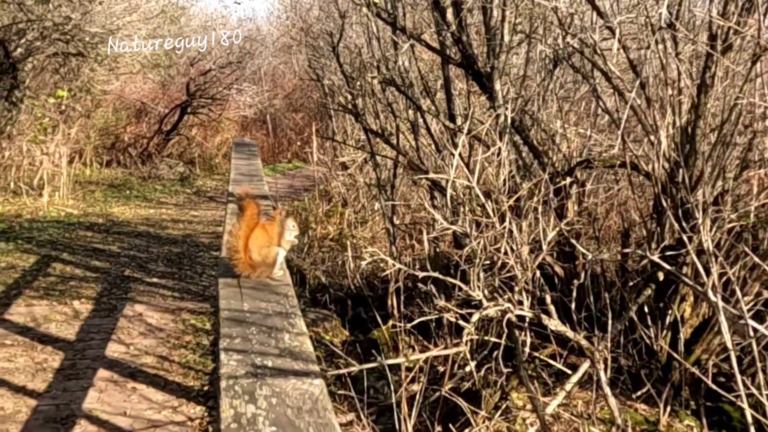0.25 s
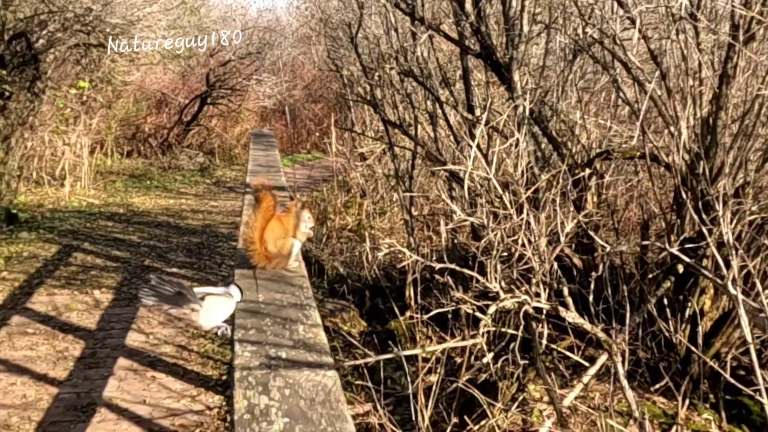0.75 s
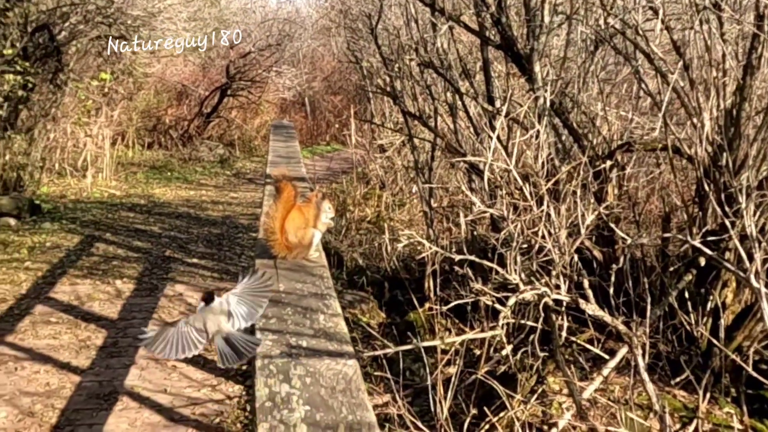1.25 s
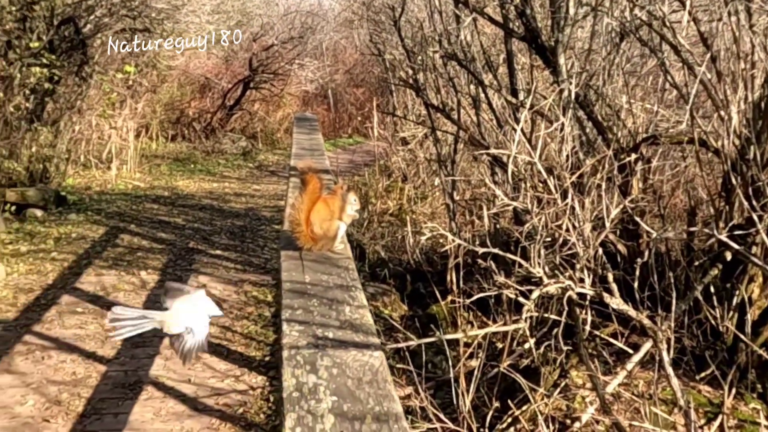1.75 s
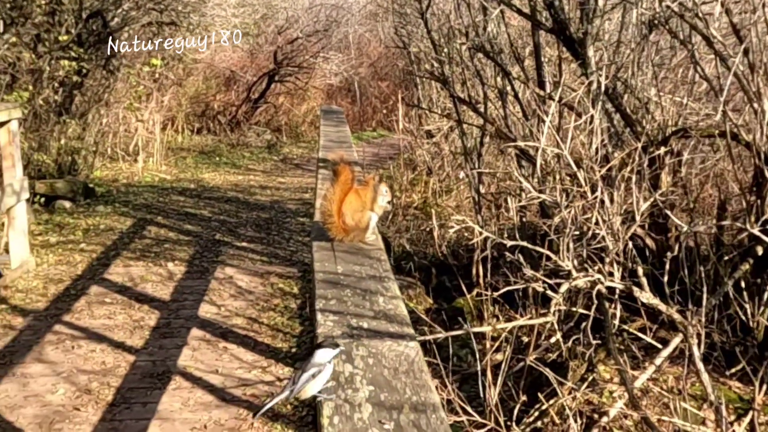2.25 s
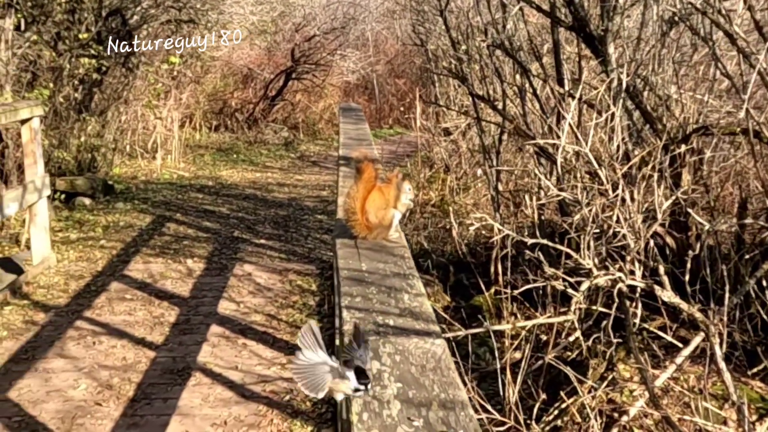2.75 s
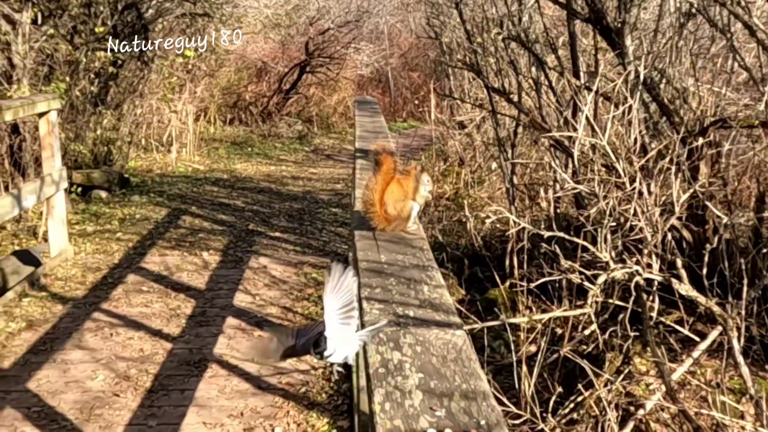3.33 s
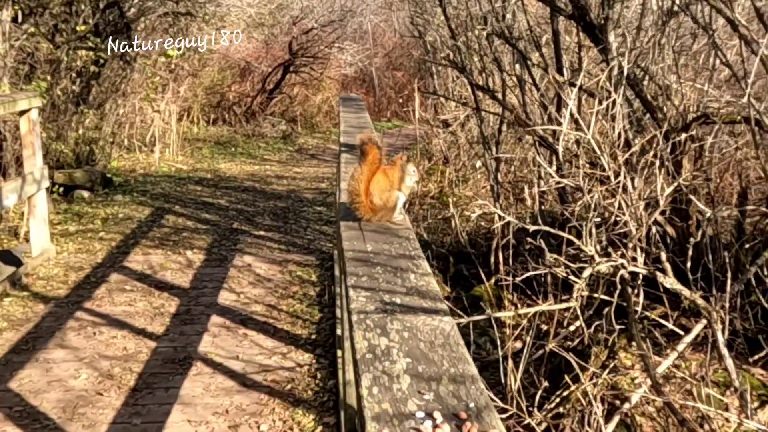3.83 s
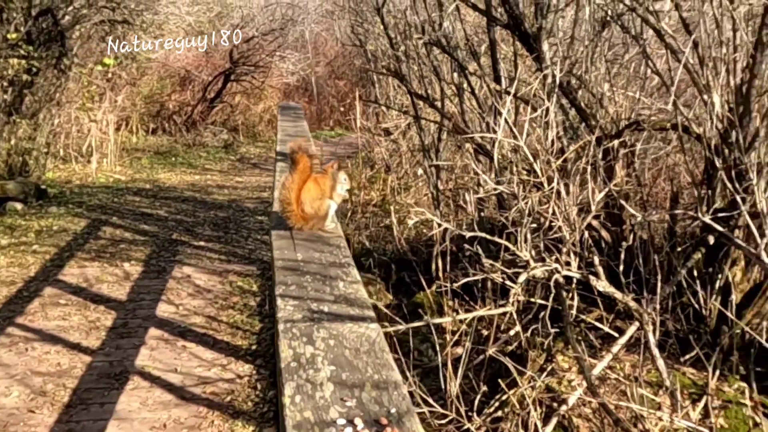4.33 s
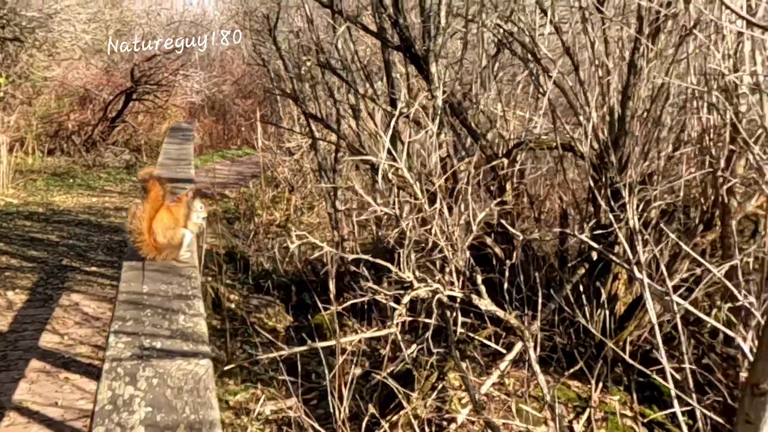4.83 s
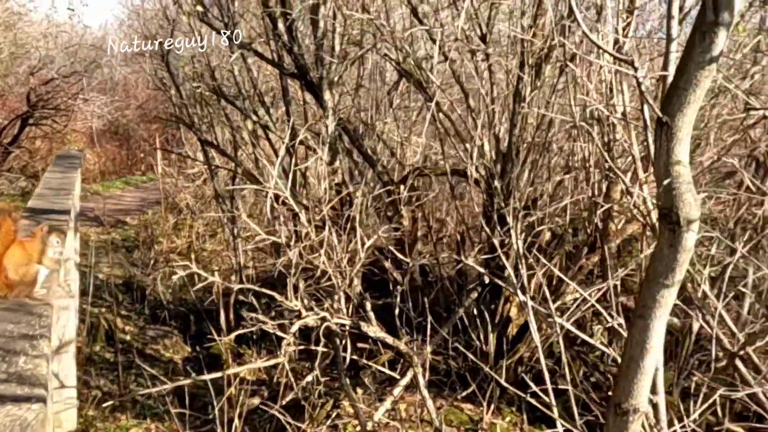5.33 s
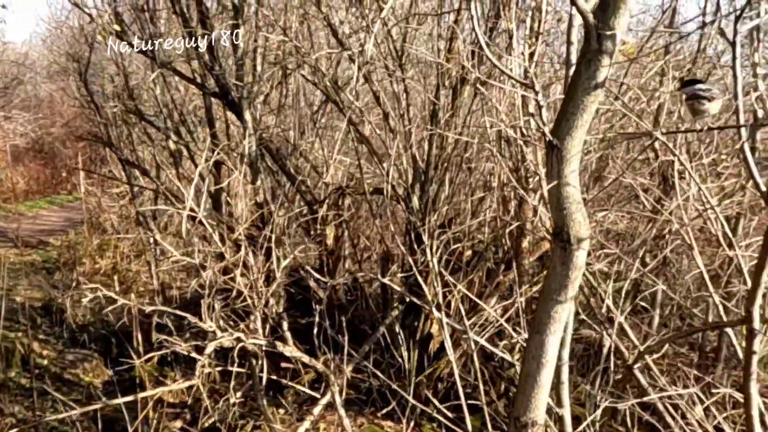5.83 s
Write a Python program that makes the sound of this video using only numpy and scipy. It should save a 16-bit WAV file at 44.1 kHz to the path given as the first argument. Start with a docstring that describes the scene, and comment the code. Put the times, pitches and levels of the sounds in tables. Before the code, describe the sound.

Outdoors in bare shrubland, low distant traffic rumbles under a soft airy wash. A few faint high peeps and claw ticks come first, then papery wing whirrs and scuffles build on a wooden rail, with sharp wing slaps near the middle. Close chickadees give thin piercing whistles, then two buzzy notes, then spaced lower chirps, with others answering faintly. The stereo microphone is close, catching short scatter from twigs.

```python
"""Bare shrubland with a wooden rail, far traffic rumbling low beneath a soft wash.
Close to the microphone, chickadees whistle thin arched notes, most ending in a quick downward flick: near sines
with a moving pitch. One adds two buzzy 'dee' notes, stacks of harmonics under two resonances.
Others answer from the thicket, heard only as scatter. Wings whirr in shaped noise; claws tick on the rail
and a few wings slap sharply, as short cracks with a knock. The twigs scatter birds, wings and ticks."""
import sys
import numpy as np
from scipy import signal
from scipy.fft import rfft, irfft, next_fast_len
from scipy.io import wavfile
from scipy.ndimage import uniform_filter1d

SR = 44100
rng = np.random.default_rng(int(sys.argv[2]) if len(sys.argv) > 2 else 0)


def dump(signal):
    """Clip the signal to [-1, 1] and save it as 16-bit WAV at the path in sys.argv[1]."""
    limited = np.clip(np.atleast_2d(signal).T, -1, 1)
    pcm = np.round(limited * 32767).astype(np.int16)
    wavfile.write(sys.argv[1], SR, pcm)


N = 268877
TIME = np.arange(N) / SR

# spectrum of the distant rumble: hz [Hz], relative_db [dB per Hz]
RUMBLE_SPECTRUM = [(8.8, -50.5), (15, 2.5), (60, 0.5), (126, -8.5), (173, -18), (260, -26), (340, -33),
                   (570, -120)]
# course of the rumble below and above the split: at_s [s], depths_db [dB], upper_db [dB]
RUMBLE_COURSE = [(0, -30.5, -34.5), (.8, -31, -32), (1.3, -31.5, -32.5), (3.2, -32.5, -31.5),
                 (4.2, -33.5, -31), (4.8, -32.5, -34.5), (6.1, -32, -34.5)]
RUMBLE_SPLIT_HZ = 85
# a faint wavering hum within the rumble
HUM_HZ, HUM_DB = 200, -61
# spectrum of the wash of air: hz [Hz], relative_db [dB per Hz]
WASH_SPECTRUM = [(120, -24.5), (165, -6), (200, -7.5), (260, -5), (350, -4), (500, -8), (780, -13),
                 (980, -11.5), (1400, -16.5), (2080, -24), (4200, -41), (8000, -45), (9500, -63),
                 (13000, -60.5)]
# course of the wash: at_s [s], body_db [dB], treble_db [dB, used only as change about its median]
WASH_COURSE = [(0.0, -44, -50.5), (0.25, -45.5, -51.5), (2.45, -45, -51), (2.75, -43.5, -51.5),
               (3.05, -44.5, -50), (3.99, -43.5, -50.5), (4.43, -45, -51.5), (4.67, -42.5, -50),
               (5.3, -44.5, -49.5), (5.86, -45.5, -49)]
WASH_SPLIT_HZ = 650
# stereo width of the background: hz [Hz], left_right_likeness [0-1]
LIKENESS_BY_HZ = [(60, .99), (130, .98), (300, .95), (650, .6), (1400, .5), (3000, .5), (8000, .3)]
# stereo balance of the background: hz [Hz], left_over_right_db [dB]
LEAN_BY_HZ = [(100, 0), (180, 0), (300, 2.5), (520, 4.5), (900, 4.5), (1550, 3.5), (2660, 2.5), (4570, 1),
              (7850, 2.5)]

# scatter of the nearest twigs, stronger on the lower notes: hz [Hz], gain_db [dB]
TWIG_SCATTER_GAIN = [(1500, -10), (4000, -7), (5500, -6.5), (7000, -9.5), (8000, -11), (14000, -11)]
# birds deep in the thicket: start_s [s], length_s [s], pitch_hz [Hz], level_db [dB],
# huskiness [relative pitch scatter]
FAR_NOTE_ROWS = [(1.276, 0.053, 7770, -62, 0.025), (1.395, 0.037, 7410, -54.5, 0.025),
                 (1.52, 0.044, 7170, -60.5, 0.0091), (4.789, 0.034, 7120, -46.5, 0.089),
                 (4.893, 0.023, 6700, -53.5, .13), (4.968, 0.042, 7140, -47.5, 0.1),
                 (5.065, 0.031, 5320, -51.5, 0.19), (5.165, 0.043, 7030, -48, 0.074),
                 (5.356, 0.04, 7070, -50, 0.088)]

# flurries of wings and scuffling feet: start_s [s], length_s [s], level_db [dB]
FLURRIES = [(0.53, 0.17, -65.5), (.75, 0.89, -75.5), (1.368, 0.069, -62.5), (1.642, 0.021, -62),
            (1.86, 0.091, -63.5), (2.403, 0.15, -68.5), (2.854, 0.16, -67.5), (3.044, 0.01, -57),
            (3.13, 0.76, -60.5), (3.8, 0.029, -51), (3.863, 0.043, -50.5), (4.038, 0.013, -57.5),
            (5, 0.62, -75), (5.45, 0.77, -69.5)]
# their spectrum: hz [Hz], gain_db [dB]
FLURRY_COLOUR = [(200, -1), (500, 19.5), (1500, 7), (3000, -3.5), (6000, -5), (8500, -10.5), (11000, -8.5),
                 (12500, -19), (13800, -47.5)]
FLURRY_RISE_DB_PER_S, FLURRY_FALL_DB_PER_S = 251, 119
# tiny scratches of feet and feathers: average rate, scale of sizes, level relative to the wings
GRIT_PER_S, GRIT_SPREAD_DB, GRIT_DB = 1600, 4, -2
# sharpness and range of their pitches
GRIT_Q, GRIT_LOW_HZ, GRIT_HIGH_HZ = 10, 2200, 11000

# ticks of claws on the rail, and a few sharp wing slaps near 3.8-3.9 s: start_s [s], level_db [dB],
# crack_hz [Hz], knock_db [dB, knock relative to the crack]
TICK_AND_SLAP_ROWS = [(.630, -48, 9000, -17), (1.058, -39.5, 2900, -13), (1.378, -48, 3200, -16),
                      (2.053, -39.5, 3320, -2), (2.557, -45.5, 2400, -16), (3.005, -42.5, 2600, -5),
                      (3.015, -48, 3200, -12), (3.041, -42, 5200, -20), (3.047, -38.5, 4900, -13),
                      (3.048, -40, 10500, -27), (3.071, -42, 3300, -22), (3.178, -45, 3100, -13),
                      (3.207, -47, 9500, -18), (3.270, -45, 5700, -22), (3.372, -38.5, 2600, -16),
                      (3.397, -43, 2400, -7), (3.415, -43, 6100, -24), (3.573, -43, 2400, -18),
                      (3.612, -39.5, 2500, -22), (3.655, -44, 5200, -20), (3.788, -35, 4000, -22),
                      (3.796, -32, 5700, -36), (3.809, -37, 5100, -25), (3.840, -27, 5170, -38),
                      (3.873, -42, 2800, -20), (3.887, -27, 3370, -23), (3.888, -31, 9800, -34),
                      (3.914, -40, 3500, -18), (3.930, -41, 2700, -16), (4.007, -47, 2400, -3.5),
                      (4.050, -45, 4900, -20), (4.262, -45.5, 5300, -16)]
# spectrum of the noise in the cracks: hz [Hz], gain_db [dB]
CRACK_COLOUR = [(600, -34), (2200, 0.5), (3300, -1.5), (5500, -3.5), (8000, -7.5), (11500, -14.5),
                (14000, -42.5)]
# modes of the rail's short knock: hz [Hz], relative_db [dB], t60_s [s]
RAIL_KNOCK_MODES = [(460, 1, 0.11), (790, -4, 0.038), (1150, 12.5, 0.025), (1216, 1, 0.037),
                    (1630, -3, 0.024), (2500, -16, 0.0092), (3250, 7.5, 0.012)]
# how narrowly a crack rings, and the broad burst of noise around it
CRACK_Q, BURST_DB = 2, 0

# two buzzy notes, each a contour: at_s [s], pulse_rate_hz [Hz], level_db [dB],
# lower_resonance_hz [Hz], upper_resonance_hz [Hz], rasp_db [dB relative to the harmonics]
DEE_CONTOURS = [
    [(4.629, 380, -42, 4800, 5600, 5), (4.646, 388, -45, 3950, 4700, -1),
     (4.660, 396, -44, 3960, 4360, -14), (4.680, 396, -42.5, 3960, 4350, -19),
     (4.703, 390, -48.5, 3500, 3900, -7), (4.733, 384, -53, 3400, 3800, -3),
     (4.752, 370, -56, 3100, 3500, 0)],
    [(4.818, 378, -59, 3500, 3900, -2), (4.838, 386, -51, 3250, 3860, -7),
     (4.868, 390, -49, 3400, 3560, -14), (4.897, 396, -49, 3170, 4020, -15),
     (4.928, 390, -46.5, 3370, 3920, -11), (4.944, 372, -56, 3100, 3500, -3)],
]
# overall colour of the buzz: hz [Hz], relative_db [dB]
BUZZ_COLOUR = [(1150, -20), (1570, -8), (1970, 9), (2350, 2), (2750, -2), (3150, -1.5), (3500, 1),
               (4300, -.5), (5100, 4), (6200, 0), (8500, -12)]

# near whistles, one row for each voice of the syrinx: start_s [s], length_s [s, before the flick],
# turn_hz [Hz, pitch at the turn], scoop [share by which it starts lower], turn [place of the turn, 0-1],
# level_db [dB], swell_db [dB, start to end], bulge_db [dB, middle over ends], flick_s [s],
# flick_step_db [dB, step into the flick], end_hz [Hz, pitch the flick falls towards],
# pan_db [dB, left over right], sent_db [dB, share sent into the shrubs]
WHISTLE_ROWS = [ (0.461, 0.049, 7360, 0.13, .58, -47, -6, -3, 0, 0, 7000, -1.5, -1),
                (1.23, 0.036, 7140, -0.036, 0.51, -38.5, -7, 2, 0.012, 4, 4560, 2, -3),
                (3.436, .017, 8200, .16, .8, -56, 2, 2, .022, 6, 4200, 8, 0),
                (3.633, 0.06, 8145, 0.11, .76, -34, 13, 5, 0.017, 2.5, 4400, -3, 2.5),
                (3.643, 0.06, 9600, 0.17, .7, -38, -5, -1, 0, 0, 9000, 0, 0),
                (3.739, .043, 7890, 0.13, 0.7, -30.5, -13.5, -7.5, .013, 4.5, 4270, -3, 2),
                (3.861, .051, 7865, 0.11, 0.75, -32, -8, -2, 0.0081, 3.5, 5000, -2.5, 2),
                (4.118, 0.059, 7966, 0.1, 0.77, -29.5, 6.5, 3, 0.012, -2.5, 4700, -4, 0),
                (4.444, 0.015, 6360, 0.27, 0.9, -45, -1, -1, 0.0048, -1, 6240, 6, 4),
                (4.445, 0.013, 7370, 0.006, 0.17, -43, -10, 3, 0.0027, 0, 7000, 9, -3),
                (4.459, .060, 7050, .09, .95, -34.5, 13, 5, .011, -5, 4600, 7, 3),
                (4.595, .033, 8900, .38, .54, -55, 14, -5, .009, 3, 4600, 7, 2),
                (4.599, 0.033, 4250, 0.058, 0.33, -49.5, -8, 1, 0.0058, -2, 4000, 8, 6),
                (4.706, .037, 7330, -.05, .65, -48, 2, 3, .014, -5, 3400, -2, -3),
                (4.934, .041, 6070, .08, .68, -42.5, 0, 3, .010, -3, 4900, -2.5, -1),
                (4.969, .037, 7260, -.025, .55, -46, 0, 3, .009, 3, 4300, -1.6, 0),
                (5.286, .044, 5920, .13, .58, -40, 1, 5, .010, -3, 4700, -7, -1),
                (5.333, .035, 7250, -.02, .6, -47, 2, 4, .008, 1, 4400, -2, 0),
                (5.622, 0.043, 5375, .05, 1, -38.5, 3, 0.5, 0.011, -9, 4530, -7.4, -3), ]
ATTACK_S, RELEASE_S = .008, .003
# trembling of the voice in pitch (share) and level, and the extra trembling within the flick
WAVER, WAVER_DB = .004, 1.5
FLICK_WAVER, FLICK_WAVER_DB = .05, 4
# how sharply the flick falls (no unit), and how far it fades
FLICK_FALL, FLICK_FADE_DB = 3, 18
# the throat passes little above the birds' usual range: hz [Hz], gain_db [dB]
THROAT_GAIN = [(8250, 0), (8700, -14), (9700, -23)]
# octave strength, added to the base level below: pitch_hz [Hz], gain_db [dB]
OCTAVE_BY_PITCH = [(5300, 9.5), (6000, 4.5), (6700, -13), (7300, -31)]
OCTAVE_DB = -28.5
# faint mirror image of the octave left by the recorder: pitch_hz [Hz], level_db [dB relative to the octave]
IMAGE_BY_PITCH = [(5400, -13), (5900, -27)]
# the image is folded about this frequency
FOLD_HZ = 12000


def from_db(db):
    """Decibels to gain."""
    return 10 ** (np.asarray(db) / 20)


def rms_one(x):
    """Scale to unit power."""
    return x / np.sqrt(np.mean(x ** 2) + 1e-20)


def in_time(rows, t=TIME):
    """Each column of a curve at the times t."""
    s, *columns = np.transpose(rows)
    return [np.interp(t, np.sort(s), c) for c in columns]


def at_hz(points, hz):
    """Read a spectrum on a log-frequency axis."""
    f, value = np.transpose(points)
    return np.interp(np.log(np.maximum(hz, 1)), np.log(f), value)


def coloured(x, spectrum):
    """Shape a sound by a spectrum that falls away steeply past its ends."""
    size = next_fast_len(x.shape[-1])
    hz = np.maximum(np.fft.rfftfreq(size, 1 / SR), 1)
    skirts = np.minimum(1, np.minimum(hz / spectrum[0][0], spectrum[-1][0] / hz)) ** 6
    shaped = rfft(x, size) * from_db(at_hz(spectrum, hz)) * skirts
    return irfft(shaped, size)[..., :x.shape[-1]]


def resonant(x, hz, q):
    """Pass a sound through one resonance."""
    return signal.lfilter(*signal.iirpeak(min(hz, .4 * SR), q, fs=SR), x + 1e-18)


def lowpassed(x, hz):
    """Keep the part below a gentle split, without delay."""
    return signal.sosfiltfilt(signal.butter(2, hz, fs=SR, output="sos"), x)


def drift(rate, t):
    """Random line between normal draws of spread 1, with so many new draws a second."""
    steps = (t - t[0]) * rate
    count = int(steps[-1]) + 2
    return np.interp(steps, np.arange(count), rng.standard_normal(count))


def panned(x, pan_db):
    """Place a sound between left and right by level; positive leans left."""
    gains = from_db(np.array([[pan_db], [-pan_db]]) / 2)
    return x * gains / gains.mean()


def add(out, start, x):
    """Mix a short sound in at its time."""
    i = max(round(start * SR), 0)
    out[:, i:i + x.shape[-1]] += x[..., :N - i]


def note_times(rows):
    """The sample times that a note spans, and its soft-edged gate."""
    s = np.transpose(rows)[0]
    t = np.arange(s.min(), s.max(), 1 / SR)
    edge = np.clip(np.minimum(t - t[0], t[-1] - t) / .0018, 0, 1)
    return t, np.sin(np.pi / 2 * edge) ** 2


def diffuse(spectrum):
    """Stereo noise from all around: alike in the bass, wider higher up."""
    size = next_fast_len(N)
    hz = np.fft.rfftfreq(size, 1 / SR)
    mid, side = rfft(rng.standard_normal((2, size)))
    alike = np.clip(at_hz(LIKENESS_BY_HZ, hz), 0, .988)
    sides = np.array([[1], [-1]])
    pair = np.sqrt(1 + alike) * mid + np.sqrt(1 - alike) * side * sides
    pair = pair * from_db(at_hz(LEAN_BY_HZ, hz) * sides / 2)
    return rms_one(coloured(irfft(pair, size), spectrum)[:, :N])


def thicket(x, t60, gap):
    """Many faint reflections off twigs and ground, different at each ear; unit energy."""
    t = np.arange(SR // 2) / SR
    # cubed noise makes a few echoes stand out
    echoes = rng.standard_normal((2, len(t))) ** 3 * from_db(-60 * t / t60) * (t > gap)
    echoes /= np.sqrt(np.sum(echoes ** 2, axis=1, keepdims=True))
    return signal.fftconvolve(x.mean(axis=0)[None], echoes, axes=1)[:, :N]


def background(steadiness=0.24, lumps_db=1.5):
    """Far traffic: a deep rumble and a faint hum under a soft wash that slowly brightens."""
    rumble = diffuse(RUMBLE_SPECTRUM)
    # far traffic is steadier than plain noise
    swell = np.sqrt(uniform_filter1d(rumble[0] ** 2, size=SR // 5))
    rumble = rms_one(rumble / swell ** steadiness)
    depths = lowpassed(rumble, RUMBLE_SPLIT_HZ)
    depths_db, upper_db = in_time(RUMBLE_COURSE)
    rumble = depths * from_db(depths_db) + (rumble - depths) * from_db(upper_db)

    hum_gain = np.sqrt(2) * from_db(HUM_DB + 2 * drift(3.6, TIME))
    hum_pitch = HUM_HZ + 2 * drift(9.3, TIME)
    hum = hum_gain * np.sin(2 * np.pi * np.cumsum(hum_pitch) / SR)

    body_db, treble_db = in_time(WASH_COURSE)
    wash = diffuse(WASH_SPECTRUM)
    body = lowpassed(wash, WASH_SPLIT_HZ)
    treble = (wash - body) * from_db(treble_db - np.median(treble_db) + np.median(body_db))
    body = body * from_db(body_db + lumps_db * drift(12, TIME))
    return rumble + hum + body + treble


def far_whistles(arch=0.045, flick=0.47):
    """The same arched note and falling flick, clear or husky, heard only through the scatter of the shrubs."""
    out = np.zeros((2, N))
    for start, length, hz, level_db, husk in FAR_NOTE_ROWS:
        t = np.arange(0, length, 1 / SR)
        along = t / length
        bend = 1 - arch * (2 * along - 1) ** 2 - flick * along ** 20
        pitch = hz * (bend + husk * drift(1500, t))
        swell = np.sqrt(2 * np.abs(np.sin(np.pi * along)))
        add(out, start, swell * from_db(level_db) * np.sin(2 * np.pi * np.cumsum(pitch) / SR))
    return thicket(out, t60=0.34, gap=0.00063)


def grit(count=14):
    """Scratches of uneven size come at random, each ringing for a few cycles at one of several pitches."""
    sizes = from_db(GRIT_SPREAD_DB * np.minimum(rng.exponential(1, N), 3))
    hits = sizes * rng.choice([-1, 1], N) * (rng.random(N) < GRIT_PER_S / SR)
    dealt = rng.integers(0, count, N)
    pitches = np.geomspace(GRIT_LOW_HZ, GRIT_HIGH_HZ, count)
    rings = sum(resonant(hits * (dealt == k), hz, GRIT_Q) for k, hz in enumerate(pitches))
    return rms_one(coloured(rings, FLURRY_COLOUR))


def flutter(beat_hz=26, beat_db=3.5, stroke_db=2.5, grain_db=2.5):
    """Flurries build, hold and die away; each wingbeat starts papery and fades, with a scuffling crackle."""
    flurries_db = []
    for start, length, db in FLURRIES:
        before, after = np.maximum(start - TIME, 0), np.maximum(TIME - start - length, 0)
        flurries_db.append(db - FLURRY_RISE_DB_PER_S * before - FLURRY_FALL_DB_PER_S * after)
    level_db = np.max(flurries_db, axis=0)
    beats = np.cumsum(beat_hz * (1 + 0.143 * drift(7.4, TIME))) / SR
    stroke, within = np.divmod(beats, 1)
    # no two strokes alike
    strokes_db = stroke_db * rng.uniform(-1.4, 1, int(stroke[-1]) + 1)
    beats_db = beat_db * (1 - 2 * within) + strokes_db[stroke.astype(int)]
    brush_db = uniform_filter1d(beats_db, size=130) + grain_db * drift(500, TIME)
    brush = rms_one(coloured(rng.standard_normal(N), FLURRY_COLOUR) * from_db(brush_db))
    return panned(rms_one(brush + from_db(GRIT_DB) * grit()) * from_db(level_db), 0)


def ticks_and_slaps(t60=.011, crack_db=-5):
    """Claw ticks and a few sharp wing slaps: a dry crack with its own pitch that dies at once, and a short knock."""
    out, t = np.zeros((2, N)), np.arange(SR // 15) / SR
    for start, level_db, centre_hz, knock_db in TICK_AND_SLAP_ROWS:
        ringing, burst = coloured(rng.standard_normal((2, len(t))), CRACK_COLOUR)
        ringing = rms_one(resonant(ringing, centre_hz, CRACK_Q))
        crack = rms_one(ringing + from_db(BURST_DB) * rms_one(burst))
        crack = crack * from_db(crack_db - 60 * t / t60)
        knock = sum(from_db(db - 60 * t / ring) * np.sin(2 * np.pi * hz * t)
                    for hz, db, ring in RAIL_KNOCK_MODES)
        add(out, start, from_db(level_db) * (crack + from_db(knock_db) * knock / 2))
    return out


def dees(width_hz=240, jitter=.006, shimmer_db=3.2, rasp_per_s=600, pan_db=7):
    """Both sides of the syrinx beat into harmonics under two wandering resonances, hoarser at the note's ends."""
    out = np.zeros((2, N))
    for contour in DEE_CONTOURS:
        t, gate = note_times(contour)
        rate, level_db, lower_hz, upper_hz, rasp_db = in_time(contour, t)
        phase = 2 * np.pi * np.cumsum(rate * (1 + jitter * drift(434, t))) / SR
        buzz, power = 0, 0
        for k in range(3, 22):
            throat = np.sqrt(sum(1 / (1 + (2 * (k * rate - hz) / width_hz) ** 2)
                                 for hz in (lower_hz, upper_hz)))
            # each partial swells on its own
            partial = throat * from_db(at_hz(BUZZ_COLOUR, k * rate) + shimmer_db * drift(51, t))
            # noise that fills the gaps between them
            rasp = from_db(rasp_db) * (drift(rasp_per_s, t) + 1j * drift(rasp_per_s, t))
            turning = np.exp(1j * (k * phase + rng.uniform(0, 2 * np.pi)))
            buzz = buzz + np.real(partial * (1 + rasp) * turning)
            power = power + partial ** 2 * (1 + from_db(rasp_db) ** 2) / 2
        add(out, t[0], panned(gate * from_db(level_db) * buzz / np.sqrt(power), pan_db))
    return out


def whistles():
    """Each side of the syrinx sings a near sine that arches or sags, most slackening into a ragged falling flick.

    The octave is strongest on the lower notes. Gives the direct sound and what is sent into the shrubs."""
    out, sent = np.zeros((2, 2, N))
    for (start, length, turn_hz, scoop, turn, note_db, swell_db, bulge_db,
         flick_s, flick_db, end_hz, pan_db, sent_db) in WHISTLE_ROWS:
        t = np.arange(0, length + max(flick_s, 0), 1 / SR)
        along = np.minimum(t / length, 1)
        flick = np.maximum(t - length, 0) / max(flick_s, 1 / SR)
        slack = 1 - np.exp(-FLICK_FALL * flick ** 2)
        arch_hz = turn_hz * (1 - scoop * (along / turn - 1) ** 2)
        hz = arch_hz * (1 - slack) + end_hz * slack
        level_db = note_db + swell_db * (along - .5) + bulge_db * (.5 - (2 * along - 1) ** 2)
        level_db = level_db + flick_db * (flick > 0) - FLICK_FADE_DB * slack + at_hz(THROAT_GAIN, hz)
        # round off the corner into the flick
        hz, level_db = uniform_filter1d(np.array([hz, level_db]), size=100, mode="nearest")
        gate = np.minimum(t / ATTACK_S, 1) * np.minimum((t[-1] - t) / RELEASE_S, 1)
        waver = WAVER * drift(700, t) + FLICK_WAVER * slack * drift(2000, t)
        phase = 2 * np.pi * np.cumsum(hz * (1 + waver)) / SR
        image = from_db(at_hz(IMAGE_BY_PITCH, turn_hz)) * np.sin(2 * (2 * np.pi * FOLD_HZ * t - phase))
        octave_gain = from_db(OCTAVE_DB + at_hz(OCTAVE_BY_PITCH, turn_hz))
        octave_and_image = octave_gain * (np.sin(2 * phase) + image)
        tremble_db = WAVER_DB * drift(300, t) + FLICK_WAVER_DB * slack * drift(800, t)
        voice = np.sqrt(2) * gate * from_db(level_db + tremble_db) * (np.sin(phase) + octave_and_image)
        note = panned(voice, pan_db)
        add(out, start, note)
        add(sent, start, from_db(sent_db) * note)
    return out, sent


def scene():
    """Near birds with a quick scatter from the closest twigs and a faint tail; the buzz is deeper in the shrubs."""
    far = background() + far_whistles()
    bustle = flutter() + ticks_and_slaps()
    bustle_scatter = from_db(-1) * thicket(bustle, t60=0.045, gap=0.001656)
    buzz = dees()
    notes, sent = whistles()
    twigs = coloured(thicket(sent + buzz, t60=.12, gap=.004), TWIG_SCATTER_GAIN)
    notes_tail = from_db(-23) * thicket(sent, t60=.3, gap=.02)
    buzz_tail = from_db(-10) * thicket(buzz, t60=.28, gap=.008)
    return far + bustle + bustle_scatter + buzz + notes + twigs + notes_tail + buzz_tail


def record(dry):
    """At the microphone the top is cut steeply: 60 dB down from 15 kHz upwards."""
    return signal.sosfilt(signal.cheby2(12, 60, 15000, fs=SR, output="sos"), dry)


dry = scene()
out = record(dry)
dump(out)
```